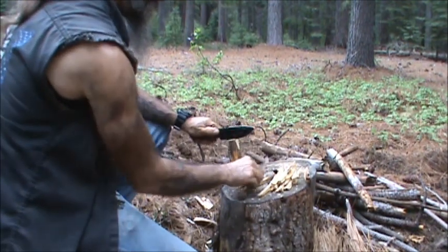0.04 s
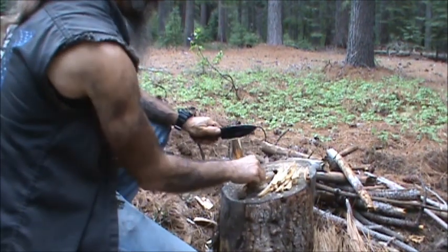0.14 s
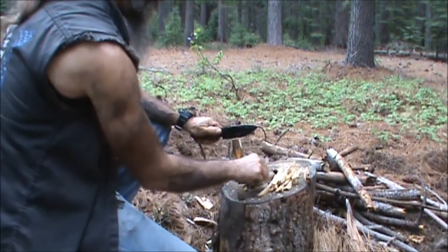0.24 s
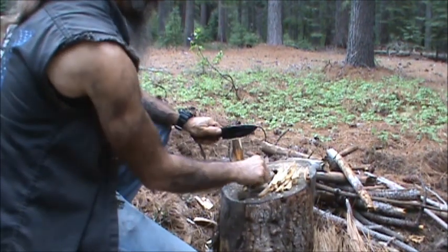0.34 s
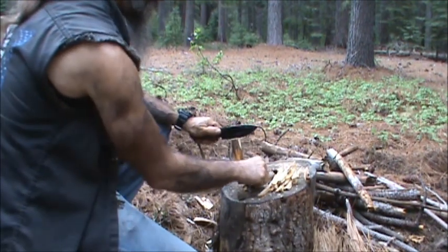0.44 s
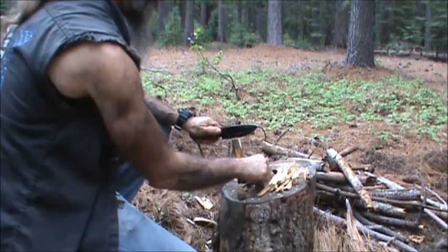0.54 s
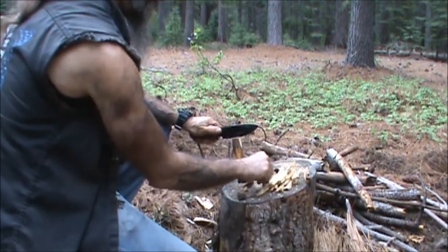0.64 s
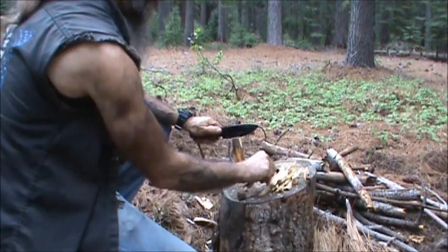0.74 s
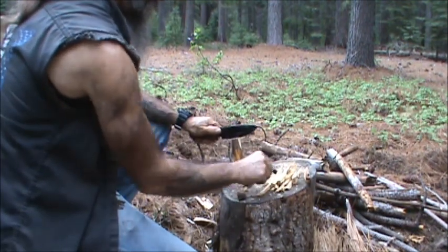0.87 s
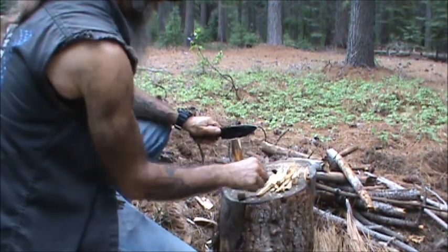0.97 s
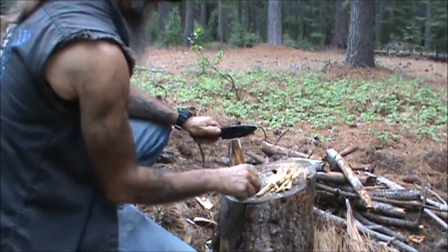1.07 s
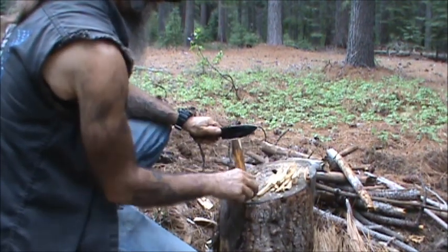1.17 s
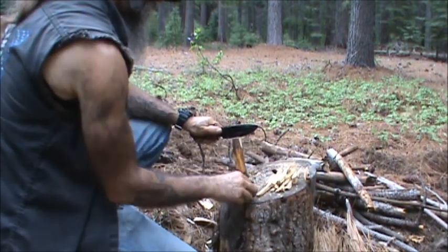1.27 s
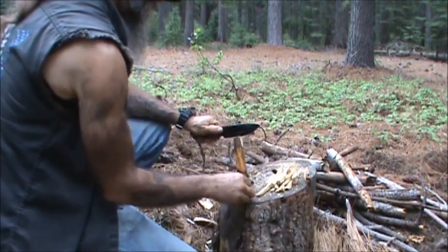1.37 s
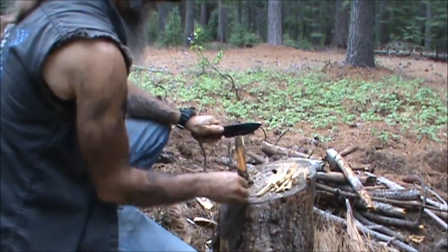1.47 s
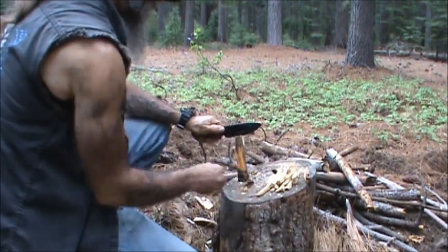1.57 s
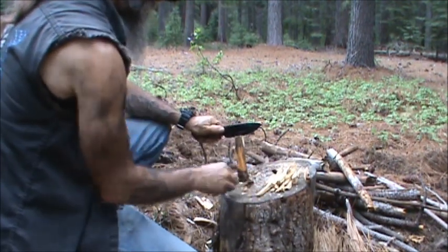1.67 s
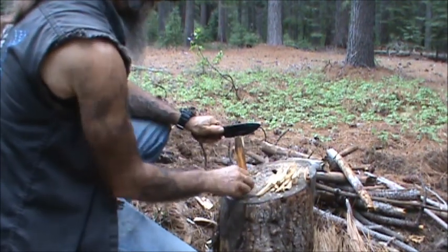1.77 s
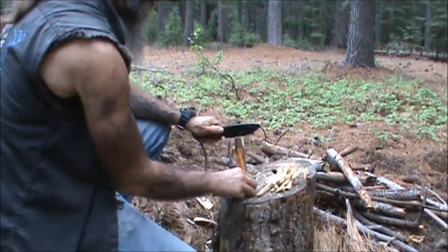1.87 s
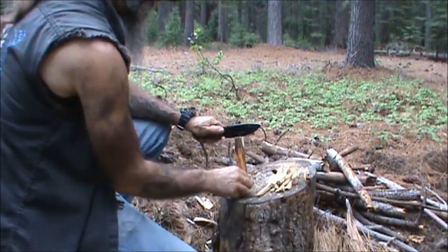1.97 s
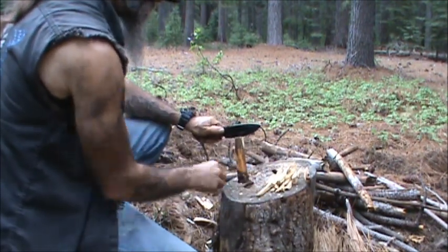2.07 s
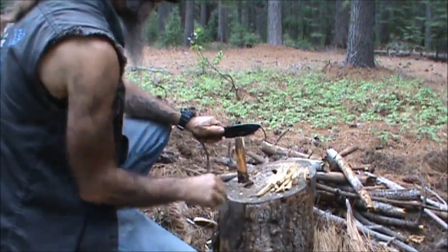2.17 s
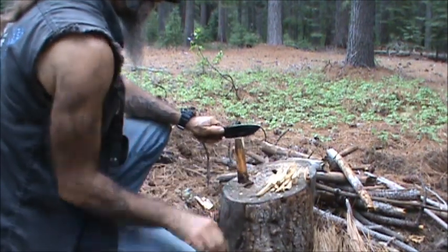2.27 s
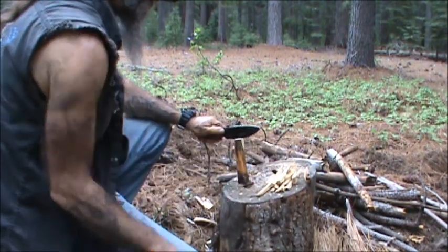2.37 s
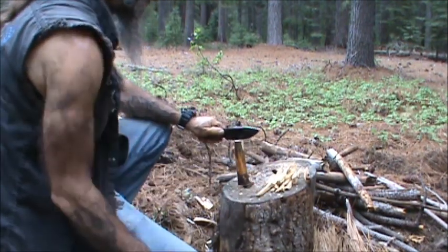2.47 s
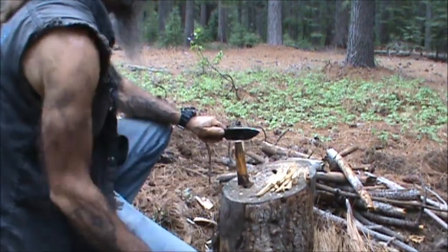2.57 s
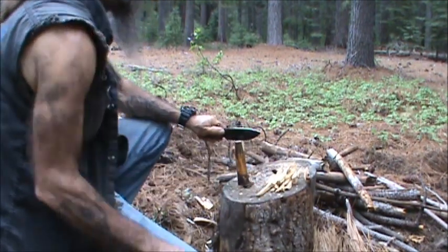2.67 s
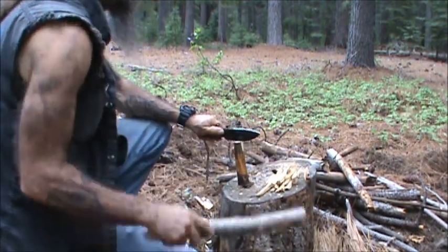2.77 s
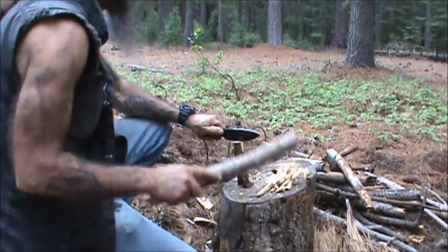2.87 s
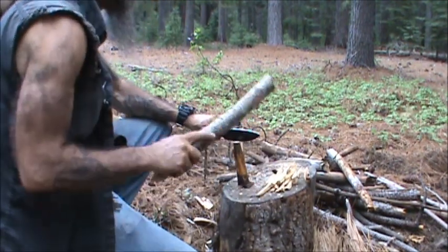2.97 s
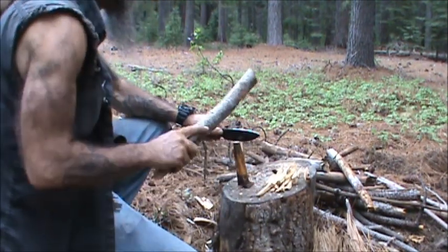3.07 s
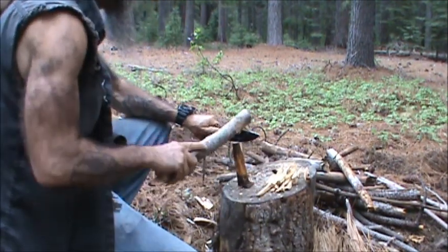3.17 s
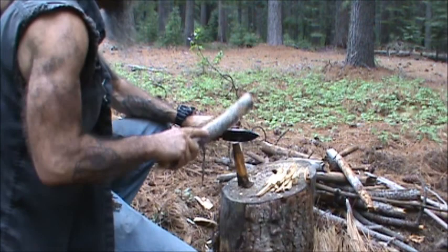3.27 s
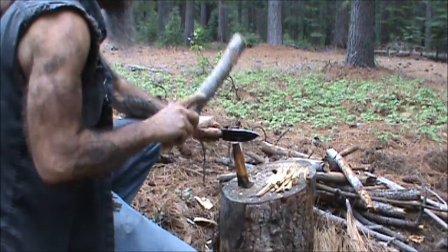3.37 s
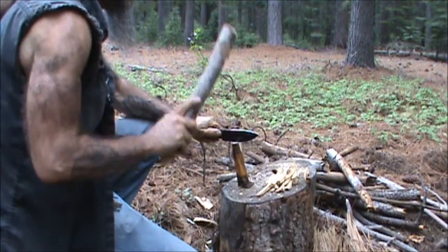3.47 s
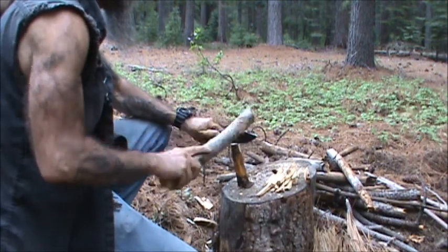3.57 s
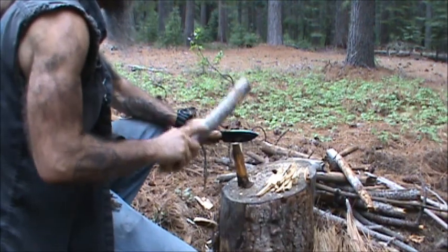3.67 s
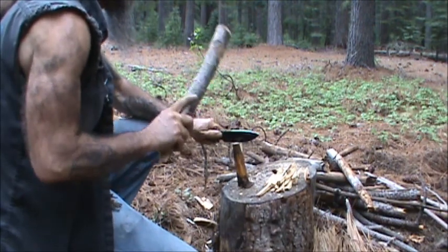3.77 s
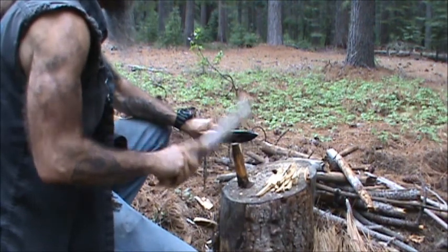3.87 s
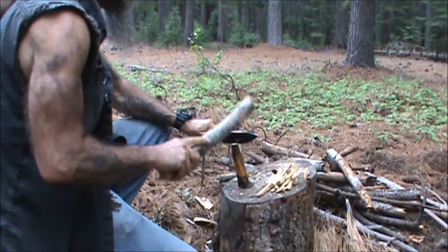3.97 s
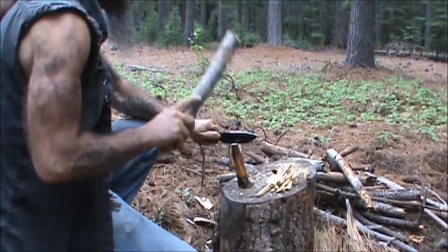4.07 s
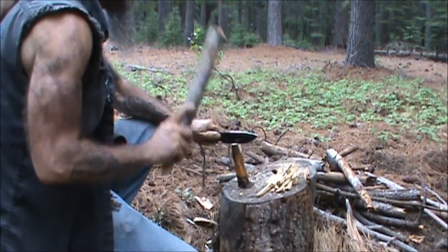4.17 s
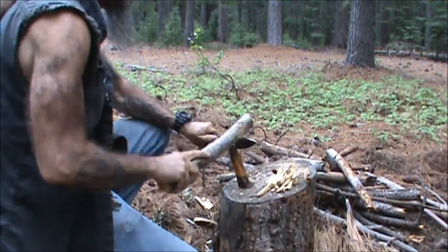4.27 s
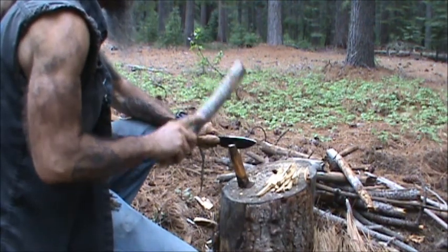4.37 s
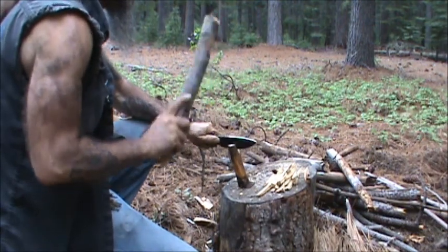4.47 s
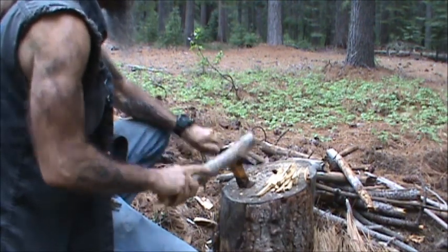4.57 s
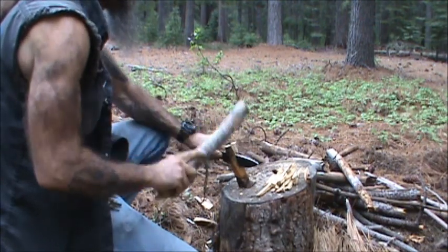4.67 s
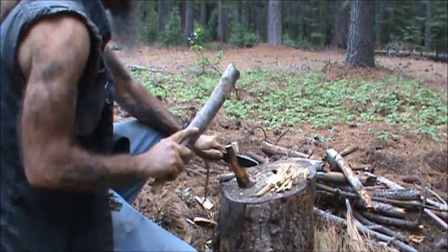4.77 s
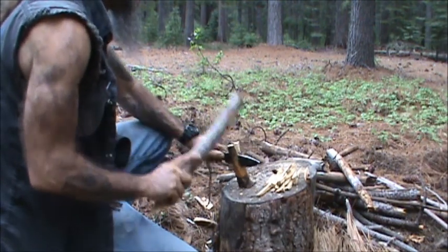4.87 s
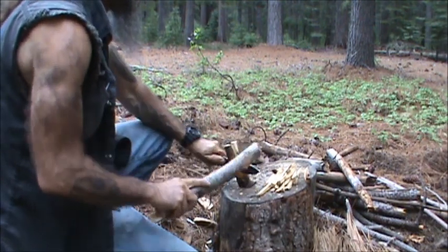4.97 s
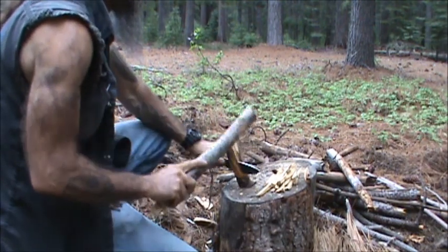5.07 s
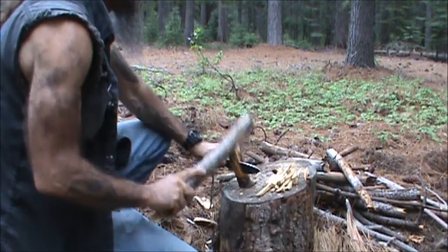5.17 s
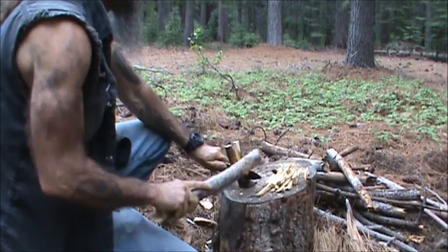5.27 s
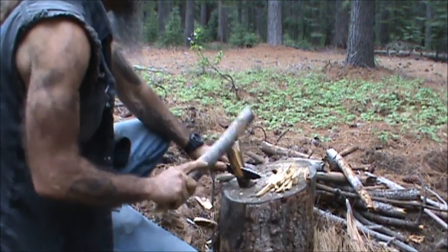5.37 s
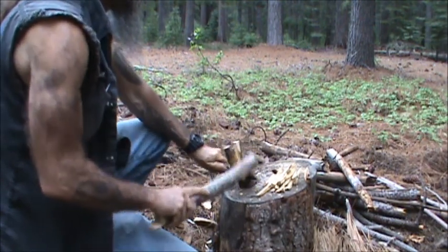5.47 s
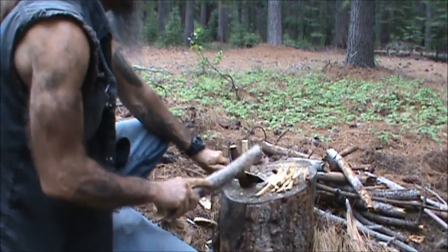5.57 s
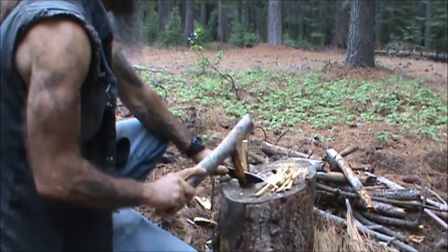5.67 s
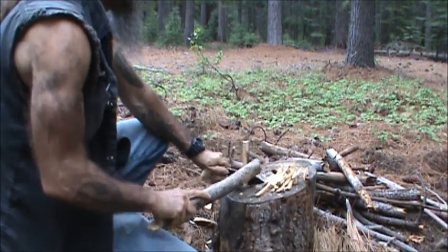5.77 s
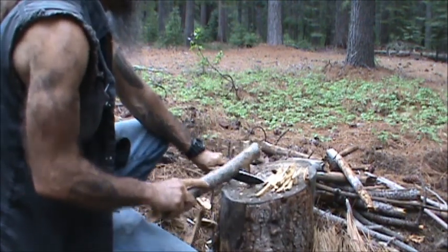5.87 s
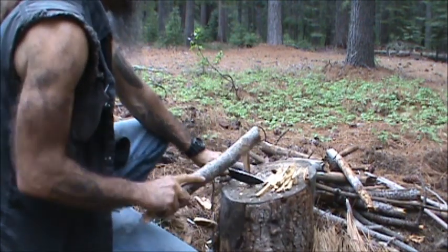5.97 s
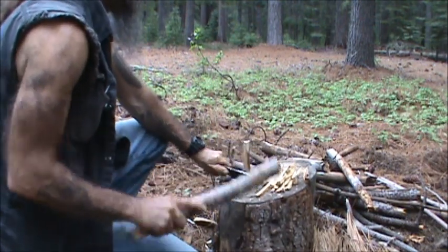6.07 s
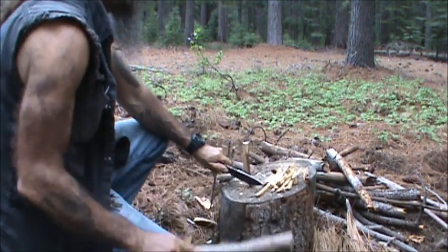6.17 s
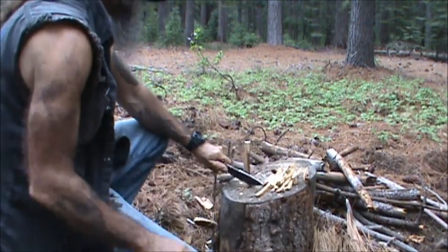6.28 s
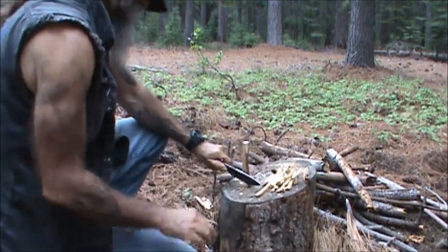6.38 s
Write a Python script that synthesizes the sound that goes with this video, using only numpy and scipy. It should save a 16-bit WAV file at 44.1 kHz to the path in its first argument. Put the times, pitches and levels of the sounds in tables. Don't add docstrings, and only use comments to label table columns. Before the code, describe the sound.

Quiet pine wood with faint hiss and lens-motor ticking, then nine sharp wooden knocks on a blade, echoing off trees, ending in rustle.

```python
import sys
import numpy as np
from scipy import signal
from scipy.fft import rfft, irfft, next_fast_len
from scipy.io import wavfile
from scipy.ndimage import uniform_filter1d

SR = 44100
rng = np.random.default_rng(int(sys.argv[2]) if len(sys.argv) > 2 else 0)


def boost_factor(decibels):
    exponent = np.asarray(decibels, float) / 20
    return 10 ** exponent


def wav_out(sig):
    wavfile.write(sys.argv[1], SR, np.round(np.clip(np.atleast_2d(sig).T, -1, 1) * 32767).astype(np.int16))


N = 283239


def read(table, hz):
    table_hz, value = np.transpose(table)
    return np.interp(np.log(np.maximum(hz, 1)), np.log(table_hz), value)


def colour(x, table):
    size = next_fast_len(len(x))
    hz = np.arange(size // 2 + 1) * SR / size
    y = irfft(rfft(x, size) * boost_factor(read(table, hz)), size)[:len(x)]
    return y / np.sqrt(np.mean(y ** 2))


def fade(t, t60_s):
    return np.exp(-np.log(1000) * t / t60_s)


def ring(t, hz, t60_s, rise_s=0.00065):
    return np.sin(2 * np.pi * hz * t) * fade(t, t60_s) * (1 - np.exp(-t / rise_s))


def add(out, s, x):
    i = int(s * SR)
    out[..., i:i + x.shape[-1]] += x[..., :N - i]


def left_right(mid, side):
    return np.array([mid + side, mid - side])


# (frequency [Hz], density [dB/Hz])
AIR_MID_SPECTRUM = [(15, -14), (25, -3), (68, 0), (238, -10.5), (273, -9), (368, -9), (669, -8), (726, -4),
                    (831, -6), (1880, -9), (2040, -8), (2820, -13), (3060, -12), (15200, -14), (16500, -26)]
# (frequency [Hz], density [dB/Hz])
AIR_SIDE_SPECTRUM = [(15, -67), (25, -28), (43, -20), (76, -10), (280, -0.5), (321, 1), (726, 3.5),
                     (1320, 3.5), (1930, 1.5), (2330, 1), (2530, 1), (10400, -12.5), (13600, -20),
                     (15200, -20), (16500, -38)]


def air():
    duck_db, release_s = 6, 1.5
    scan_hz, scan_db = 15734, -72
    t = np.arange(N) / SR
    mid = boost_factor(-56.5) * colour(rng.standard_normal(N), AIR_MID_SPECTRUM)
    mid += boost_factor(scan_db) * np.sin(2 * np.pi * scan_hz * t)
    side = boost_factor(-56.5) * colour(rng.standard_normal(N), AIR_SIDE_SPECTRUM)
    recovery = [np.where(t > s, np.exp(-(t - s) / release_s), 0) for s, *_ in BLOW_EVENTS]
    return left_right(mid, side) * boost_factor(-duck_db * np.max(recovery, axis=0))


# (start [s], end [s], step click level [dB])
LENS_RUNS = [
    (.36, 1.66, -60.5),
    (4.74, 4.89, -66),
    (5.03, 5.18, -67),
]
# (frequency [Hz], level [dB], T60 [s])
GEAR_MODES = [(1950, 0, .008), (2900, -3, 0.011), (3306, 3, 0.0085), (4800, -8, .03)]
# (start [s], end [s], level [dB])
COIL_WHINES = [(.36, .43, -62.5), (.5, .62, -63), (.65, .72, -63), (.93, 1.02, -64), (1.13, 1.19, -65),
               (1.26, 1.32, -64), (1.36, 1.66, -64), (5.09, 5.18, -67.5)]


def lens():
    first_s, rate_hz = .5045, 30000 / 1001
    whine_hz, whine_s, whine_delay_s = 1173, 0.026, 0.00299
    out, t = np.zeros(N), np.arange(SR // 20) / SR
    swell = np.sin(np.pi * np.minimum(t / whine_s, 1)) ** 2
    whine = np.sin(2 * np.pi * whine_hz * t) * swell
    for start, end, click_db in LENS_RUNS:
        steps = np.arange(np.ceil((start - first_s) * rate_hz), (end - first_s) * rate_hz)
        for at in first_s + steps / rate_hz:
            spread_db = 2.5 * rng.standard_normal(len(GEAR_MODES) + 1)
            click = sum(boost_factor(db + d) * ring(t, hz, t60_s)
                        for (hz, db, t60_s), d in zip(GEAR_MODES, spread_db))
            add(out, at, boost_factor(click_db + 15.5) * click)
            gain = sum(boost_factor(db) for on, off, db in COIL_WHINES if on < at < off)
            add(out, at + whine_delay_s, gain * boost_factor(10.5 + .5 * spread_db[-1]) * whine)
    return out


# (time [s], level [dB], rise [s], hold [s])
RUSTLE_EVENTS = [(2.398, -47.5, .006, .05), (2.66, -59, .3, .01), (2.766, -47.5, .065, .01),
                 (2.896, -53.5, .045, .01), (5.915, -55, .02, .004), (5.95, -56, .01, .01),
                 (6.192, -51, .012, .016), (6.246, -49, .004, .005), (6.228, -59, .02, .004),
                 (6.26, -43.5, .004, .015)]
# (frequency [Hz], density [dB/Hz])
LITTER_SPECTRUM = [(290, -29), (500, -16), (729, -17), (1260, -1.5), (1380, -2), (1670, -10), (1840, 3),
                   (4280, 4), (5880, -2), (8090, 6), (16000, -15.5)]


def rustle():
    rise_db, settle_db_per_s = 20, 620
    t, gain = np.arange(N) / SR, 0
    for s, db, rise_s, hold_s in RUSTLE_EVENTS:
        rise = rise_db * np.maximum(s - t, 0) / rise_s
        settle = settle_db_per_s * np.maximum(t - s - hold_s, 0)
        gain = gain + boost_factor(db - rise - settle)
    snaps = rng.standard_normal((2, N)) * boost_factor(2.2 * rng.exponential(size=N))
    mid, side = (gain * colour(x, LITTER_SPECTRUM) for x in snaps)
    return boost_factor(-2.0) * left_right(mid, .35 * side)


# (time [s], peak [dB], ring
# frequency [Hz], T60 [s])
TICK_EVENTS = [(0.3705, -35, 2500, 0.012), (.388, -41, 2050, 0.0096), (6.268, -39, 750, .014),
               (0.504, -35.5, 2830, .008), (0.7097, -34, 8500, .004), (.9837, -42, 4500, 0.035),
               (1.6899, -37, 2600, 0.012), (1.7379, -37.5, 2820, .006), (1.7385, -35.5, 516, 0.031),
               (1.742, -46, 135, 0.12), (1.8537, -43.5, 705, 0.017), (2.399, -31.5, 7150, 0.015),
               (2.46, -37, 1530, 0.0064), (2.623, -44, 7600, .02), (2.653, -43, 6000, .006),
               (4.943, -33, 7600, .01), (5.36, -42, 3200, .01), (5.766, -22, 2000, .014),
               (5.9185, -29.5, 175, 0.045), (5.9184, -29.5, 299, 0.018), (5.953, -42, 260, .07),
               (5.9485, -32, 1700, 0.014), (6.1954, -41, 4140, 0.045), (6.245, -40, 3080, 0.014),
               (6.265, -37.5, 7700, 0.0066), (6.276, -43, 175, 0.07), (6.3205, -35, 1850, 0.058),
               (6.322, -36, 934, 0.15), (6.328, -40, 170, .09), (6.408, -41, 7300, .015)]


def ticks():
    clicky_s = .04
    out, t = np.zeros(N), np.arange(SR // 5) / SR
    for s, db, hz, t60_s in TICK_EVENTS:
        share = np.exp(-t60_s / clicky_s)
        band = [(hz / 6, -24), (hz / 1.6, 0), (hz * 1.6, 0), (hz * 6, -24)]
        click = colour(rng.standard_normal(len(t)), band) * fade(t, 0.0085)
        tone = ring(t, hz, t60_s, rise_s=0.0006)
        add(out, s, boost_factor(db) * (share * click + (1 - share) * tone))
    return out


# (delay [s], level [dB], left minus right [dB])
TRUNK_ECHOES = [
    (0.017, 11.5, -13.5),
    (0.0266, 13, -3.5),
    (.040, 7.5, -17.5),
]


def trunks(far):
    out, t = np.zeros((2, N)), np.arange(SR // 100) / SR
    for delay_s, db, pan_db in TRUNK_ECHOES:
        bark = uniform_filter1d(rng.standard_normal(len(t)), size=5) * fade(t, 0.016)
        bark /= np.sqrt(np.sum(bark ** 2))
        echo = signal.fftconvolve(far, bark)[:N] * boost_factor(-5.5)
        add(out, delay_s, echo * boost_factor(db + np.array([[pan_db], [-pan_db]]) / 2))
    return out


# (frequency [Hz], level [dB])
FOREST_SPECTRUM = [(150, -9.5), (400, -17.5), (800, -7), (1300, -5.5), (2000, -14), (4000, -12),
                   (8000, -11.5), (16000, -14)]
# (frequency [Hz], T60 [s])
FOREST_DECAY = [(300, 0.14), (1000, 0.39), (2500, 0.51), (5000, 0.42), (12000, 0.083)]


def forest(far):
    t = np.arange(SR) / SR
    mid, side = np.zeros((2, SR))
    patchy = boost_factor(1.84 * 20 * uniform_filter1d(rng.standard_normal(SR), size=400))
    build_up = 1 - np.exp(-(t / 0.044) ** 2)
    for hz in 180 * 2 ** np.arange(0, 6.5, .5):
        edges_hz = (hz / 2 ** .25, hz * 2 ** .25)
        band = signal.butter(2, edges_hz, "band", fs=SR, output="sos")
        t60_s = read(FOREST_DECAY, hz)
        decay = fade(t, t60_s) + boost_factor(-14.5) * fade(t, 3.27 * t60_s)
        shape = boost_factor(read(FOREST_SPECTRUM, hz)) * decay * patchy * build_up
        pair = signal.sosfilt(band, rng.standard_normal((2, SR))) * shape
        mid, side = mid + pair[0], side + pair[1]
    response = left_right(mid, side * boost_factor(-5))
    return signal.fftconvolve(far[None], response, axes=1)[:, :N]


# (frequency [Hz], density [dB/Hz])
GROUND_SPECTRUM = [(30, -24.5), (60, -6.5), (100, -1), (170, -10.5), (350, -17), (550, -34.5)]


def soil(t, stump_db, noise):
    return boost_factor(stump_db - 23.5) * colour(noise, GROUND_SPECTRUM) * fade(t, 0.21) * (1 - np.exp(-t / 0.022))


# (frequency [Hz], level [dB], T60 [s])
STUMP_MODES = [(164.3, -7, 0.043), (220, 1.5, 0.031), (342, -5.5, 0.033), (580, -8, 0.025),
               (1320, 0, 0.029)]


def stump(t, stump_db):
    return sum(boost_factor(stump_db + db) * ring(t, hz, t60_s, rise_s=SR / 2e7) for hz, db, t60_s in STUMP_MODES)


# (frequency [Hz], level [dB], T60 [s])
WHOLE_MODES = [(1600, -11.5, .014), (2035, -18, .016), (2890, -25, .014), (4430, -24, .014)]


def whole_billet(t):
    return sum(boost_factor(db) * ring(t, hz, t60_s) for hz, db, t60_s in WHOLE_MODES)


# (baton [s], billet [s], blade [s], splinter [s], fibre crack [s])
RING_T60_S = (0.023, 0.033, 0.018, 0.027, .013)
# (baton [dB], billet [dB], blade [dB], splinter [dB])
TO_TREES_DB = (-7.5, -2.5, -3, 2)


def opening(s):
    return 4.4 < s < 4.7


def bodies(t, s, levels_db, factor):
    baton_hz = 915 if s < 5.4 else 950
    gripped = 3.4 < s < 4.4
    billet_hz, blade_hz = (1815, 2220) if gripped else (1770, 2340)
    splinter_hz = 3880 if opening(s) else 3520
    twin_ratio, twin_db = 1.064, -16
    near, away = np.zeros((2, len(t)))
    modes_hz = (baton_hz, billet_hz, blade_hz, splinter_hz)
    for hz, db, t60_s, trees_db in zip(modes_hz, levels_db, RING_T60_S, TO_TREES_DB):
        main = ring(t, hz, factor * t60_s, rise_s=0.00057)
        twin = ring(t, hz / twin_ratio, 1.2 * factor * t60_s)
        near -= boost_factor(db) * (main + boost_factor(twin_db) * twin)
        away -= boost_factor(db + trees_db) * main * fade(t, 0.045)
    return near, away


# (frequency [Hz], density [dB/Hz])
CRACK_SPECTRUM = [(1650, 1), (2800, -1.5), (3110, -6), (3570, 0.5), (4170, -6), (4700, -7), (5610, -4.5),
                  (6130, -13), (7770, -1), (9770, -10), (14900, -14), (16400, -27)]
# (frequency [Hz], density [dB/Hz])
THUD_SPECTRUM = [(150, -37.5), (500, -30), (800, -3), (1400, 10.5), (2600, -22.5), (4000, 2.5),
                 (8000, -48.5)]


def fibres(t, crack_db, blade_db, factor, snaps):
    onset = 1 - np.exp(-(t / 0.0021) ** 3)
    tear = fade(t, factor * RING_T60_S[4]) * onset + boost_factor(-29) * fade(t, 0.059)
    mid, side = (boost_factor(crack_db + 10) * colour(x, CRACK_SPECTRUM) * tear for x in snaps[:2])
    side = 0.44 * uniform_filter1d(side, size=3)
    thud = boost_factor(blade_db - 11.5) * colour(snaps[2], THUD_SPECTRUM) * tear
    high = signal.butter(3, 700, "high", fs=SR, output="sos")
    return signal.sosfilt(high, left_right(mid + thud, side))


# (time [s], baton [dB], billet [dB], blade [dB], forest echo [dB])
BLOW_EVENTS = [
    (3.1786, 0.5, -15.5, -15.5, -51),
    (3.5552, -7.5, -17, -9, -37.5),
    (3.893, -9.5, -16.5, -5, -36),
    (4.2343, -11.5, -15.5, -2, -33),
    (4.5682, -10, -17.5, -2.5, -33),
    (4.925, -8, -12.5, -9, -39),
    (5.2161, -9.5, -12.5, -4.5, -38),
    (5.4869, -9.5, -8, -3.5, -37),
    (5.7397, -15, -9, -0.5, -35),
]
# (time [s], baton [dB], billet [dB], blade [dB], crack [dB])
SLIP_EVENTS = [
    (5.721, -14, -19, -14, -21),
    (5.7281, -16.5, -24, -20, -24),
    (5.7302, -18, -16, -9, -25),
]
# (time [s], baton [dB], billet [dB], blade [dB], crack [dB])
LAID_EVENT = (6.3166, -28.5, -27, -21, -15)


def knocks():
    first_s = BLOW_EVENTS[0][0]
    contacts = []
    for s, baton_db, billet_db, blade_db, echo_db in BLOW_EVENTS:
        crack_db = min(-13.5, echo_db + 27) - 4.5 * (s > 5.7)
        stump_db = np.clip(-14.5 - 13.5 * (s - first_s), -38, echo_db + 29.5)
        splinter_db = 0.5 if opening(s) else -7 * (s - first_s)
        factor = 1.14 + .023 * min(echo_db + 39, 0)
        contacts.append((s, baton_db, billet_db, blade_db, crack_db, stump_db, splinter_db, echo_db, factor))
    contacts += [(*row, -44, -8, -39, .45) for row in SLIP_EVENTS]
    return contacts + [(*LAID_EVENT, -30, -8, -61, .7)]


# (frequency [Hz], level [dB])
SNAP_SPECTRUM = [(300, -28.5), (600, -11.5), (1300, 0), (2500, 1.5), (3200, -9.5), (5600, -8), (8000, -9.5),
                 (16000, -13.5)]


def blows():
    near, far, t = np.zeros((2, N)), np.zeros(N), np.arange(SR // 5) / SR
    impulse = 1. * (np.arange(len(t)) == SR // 1500)
    contact = colour(impulse, SNAP_SPECTRUM)
    for s, baton_db, billet_db, blade_db, crack_db, stump_db, splinter_db, echo_db, factor in knocks():
        levels_db = (baton_db, billet_db, blade_db, crack_db + splinter_db - 3)
        knock, away = bodies(t, s, levels_db, factor)
        knock += stump(t, stump_db)
        if s < 3.4:
            knock += whole_billet(t)
        snaps = rng.standard_normal((4, len(t))) * boost_factor(2 * rng.exponential(size=len(t)))
        knock += soil(t, stump_db, snaps[3])
        add(near, s, knock + fibres(t, crack_db, blade_db, factor, snaps))
        add(far, s, boost_factor(echo_db) * (away + boost_factor(crack_db - 16.5) * contact))
    rumble_cut = signal.butter(2, 80, "high", fs=SR, output="sos")
    return signal.sosfilt(rumble_cut, near), far


def scene():
    near, far = blows()
    background = air() + lens() + rustle() + ticks()
    return background + trunks(far) + forest(far) + near * boost_factor(np.array([[.3], [-.3]]))


def low_pass(x):
    return signal.sosfilt(signal.butter(12, 16640, fs=SR, output="sos"), x)


def record(dry):
    soft = np.tanh(0.93 * dry) / 0.7
    top_cut = signal.ellip(8, .2, 70, 16300, fs=SR, output="sos")
    return low_pass(signal.sosfilt(top_cut, soft))


dry = scene()
out = record(dry)
wav_out(out)
```